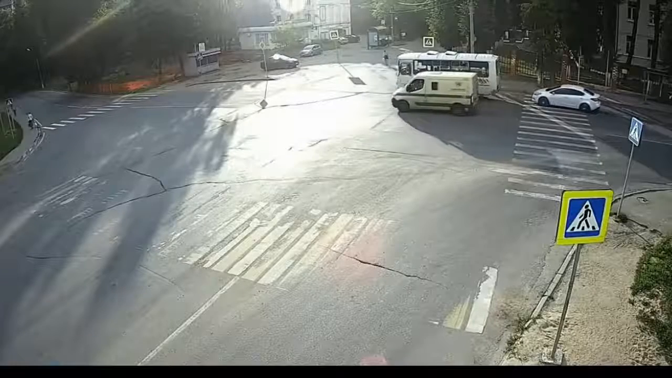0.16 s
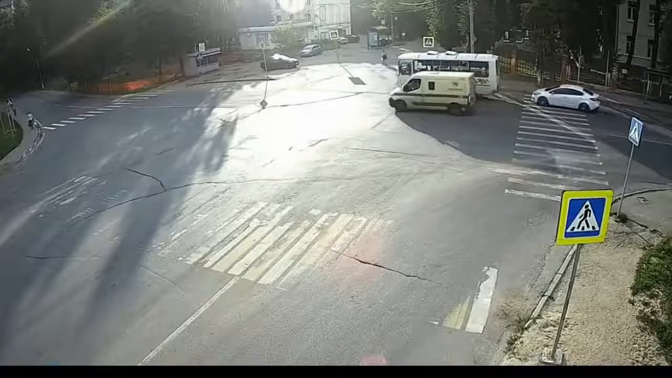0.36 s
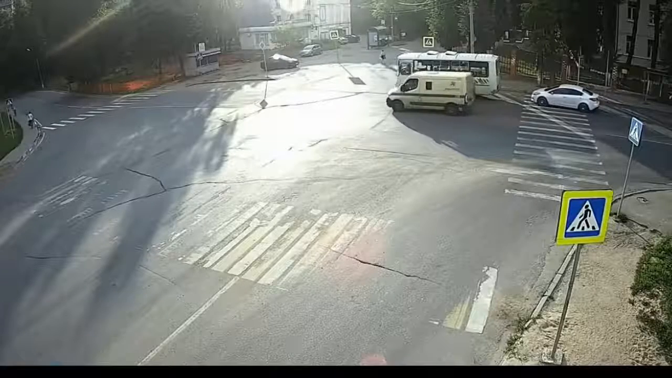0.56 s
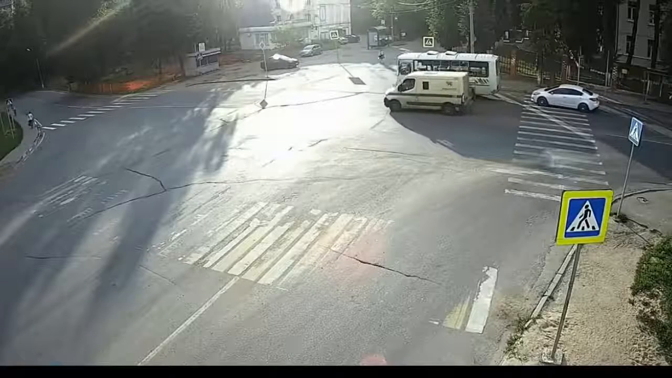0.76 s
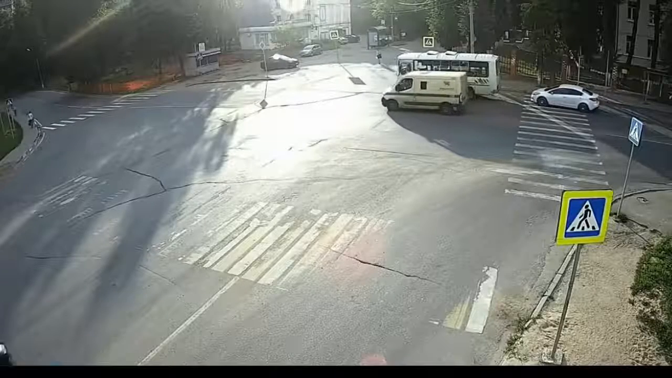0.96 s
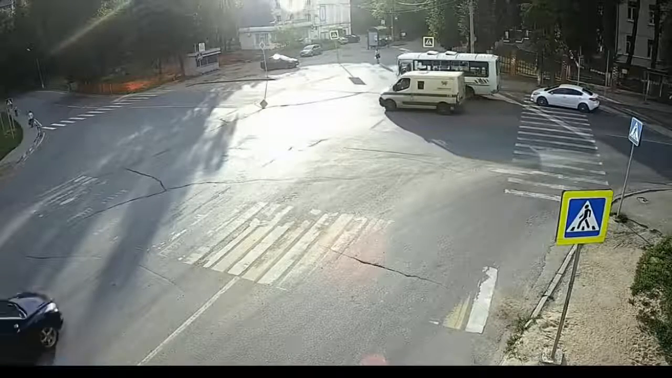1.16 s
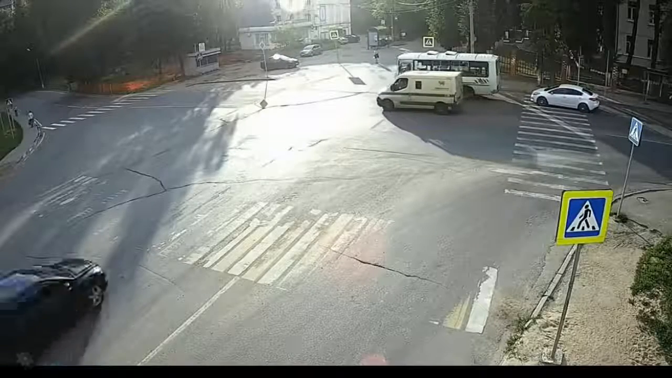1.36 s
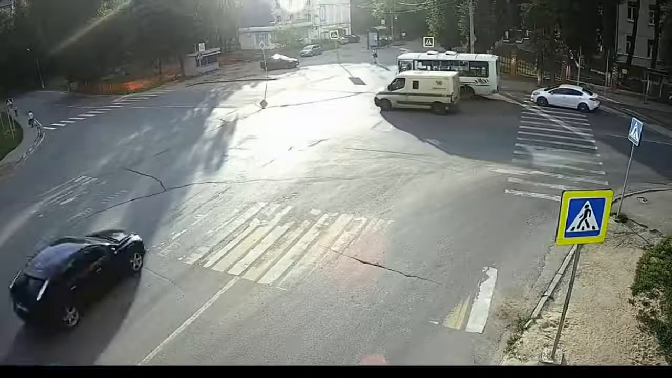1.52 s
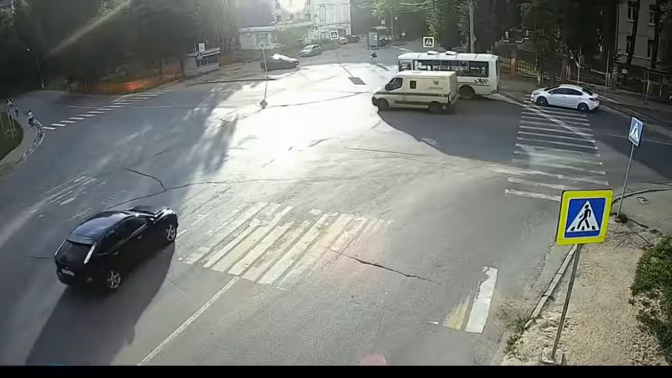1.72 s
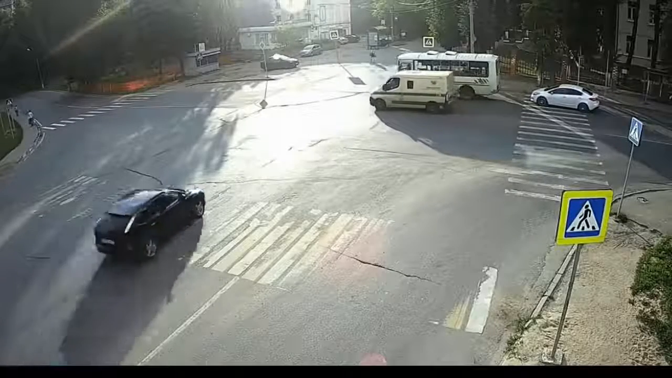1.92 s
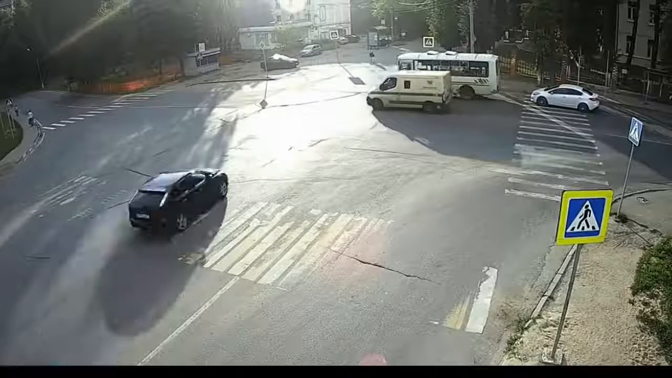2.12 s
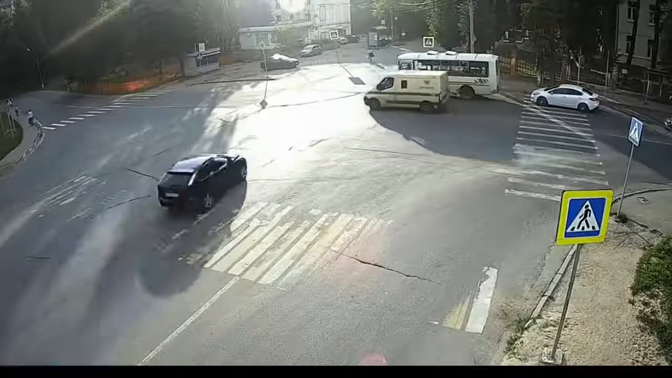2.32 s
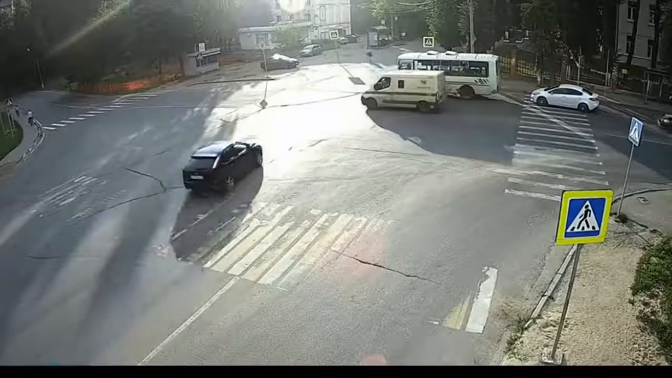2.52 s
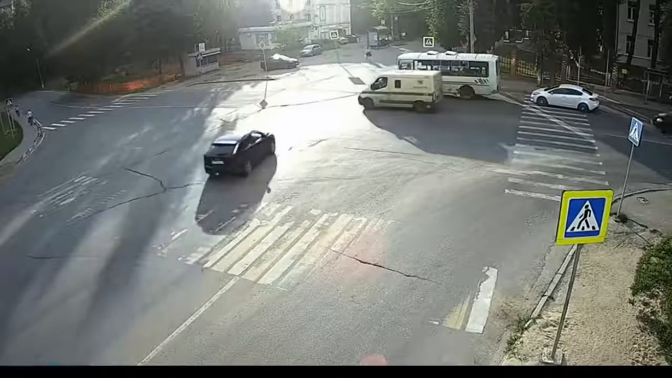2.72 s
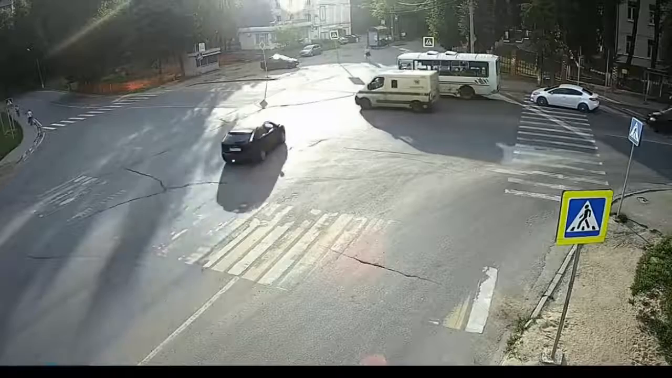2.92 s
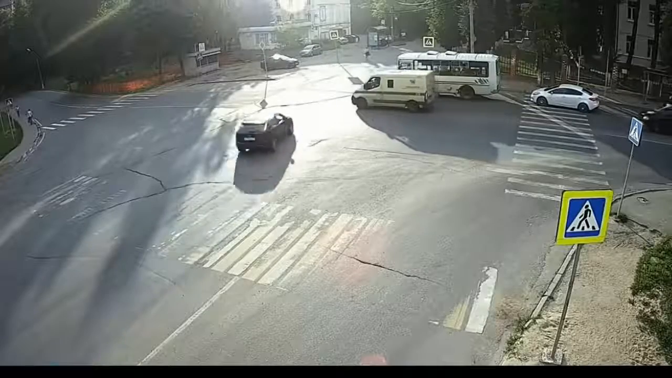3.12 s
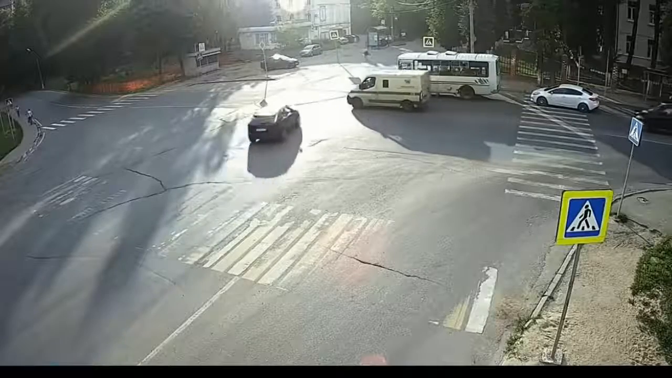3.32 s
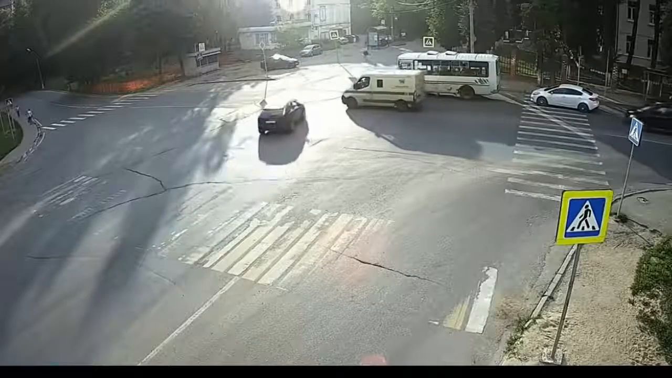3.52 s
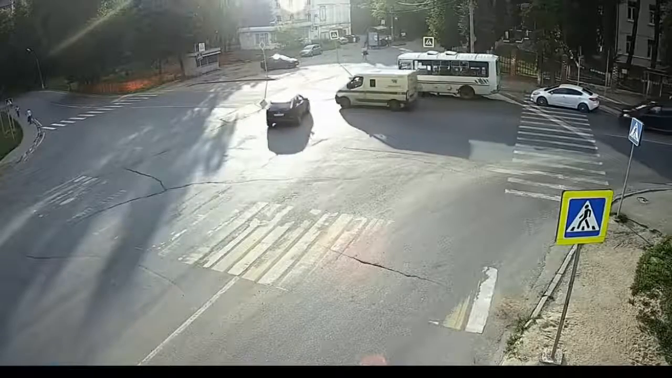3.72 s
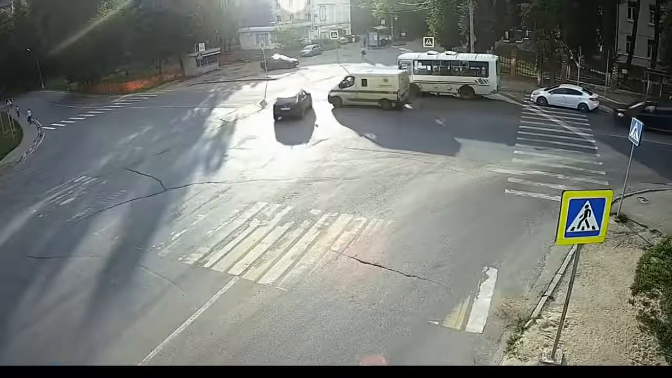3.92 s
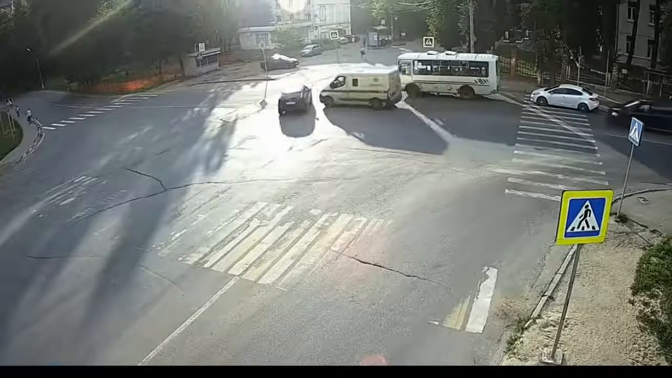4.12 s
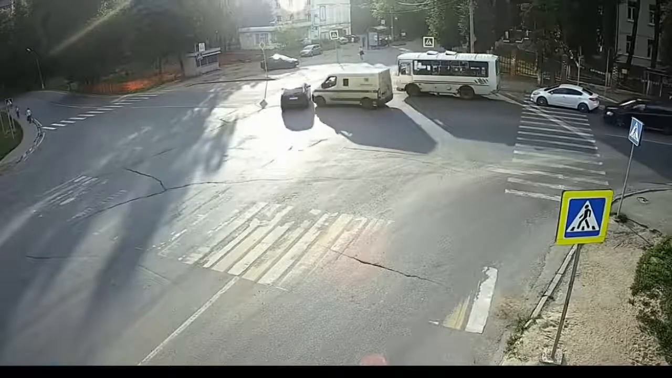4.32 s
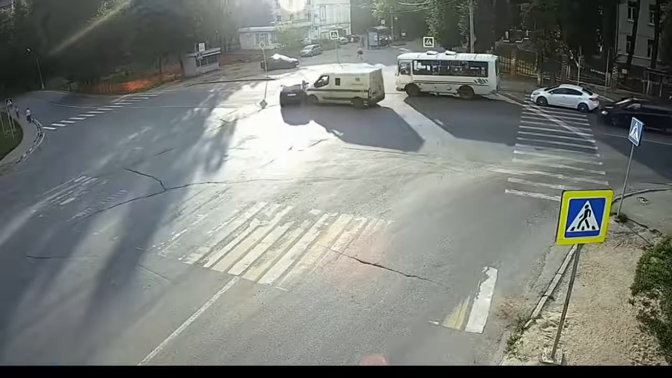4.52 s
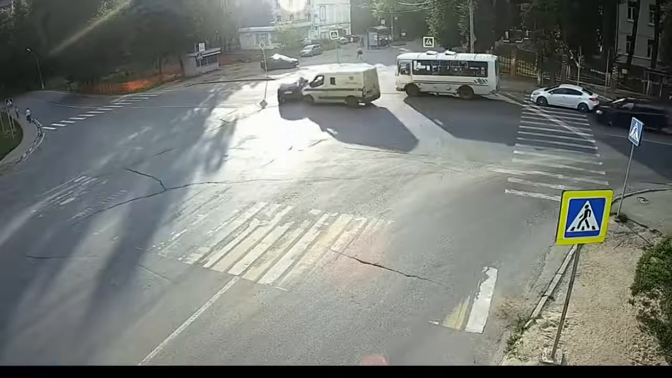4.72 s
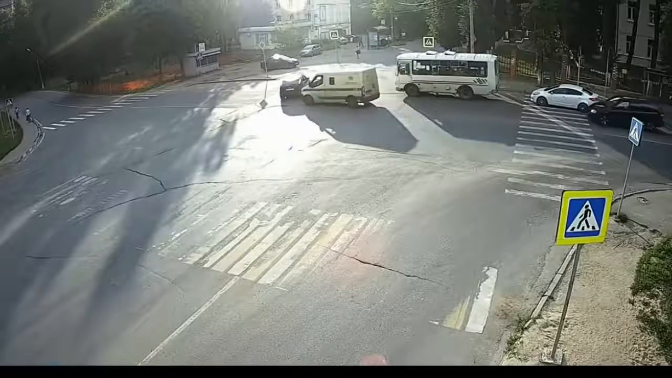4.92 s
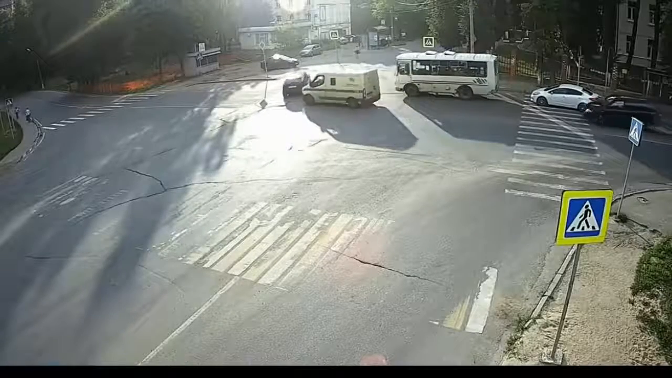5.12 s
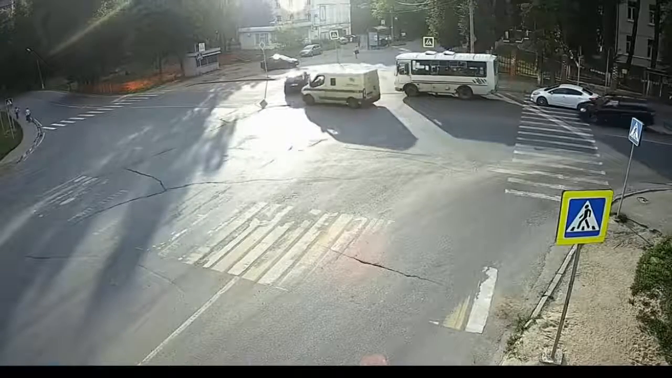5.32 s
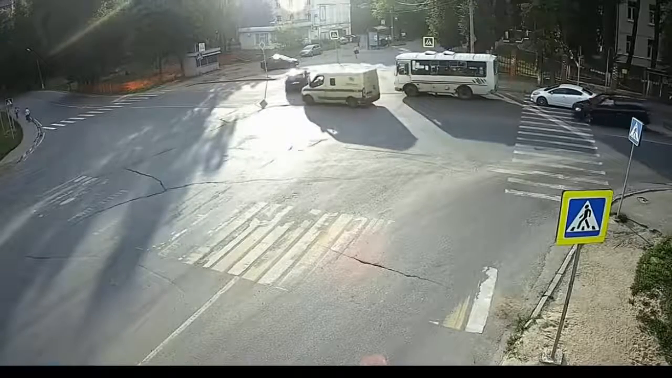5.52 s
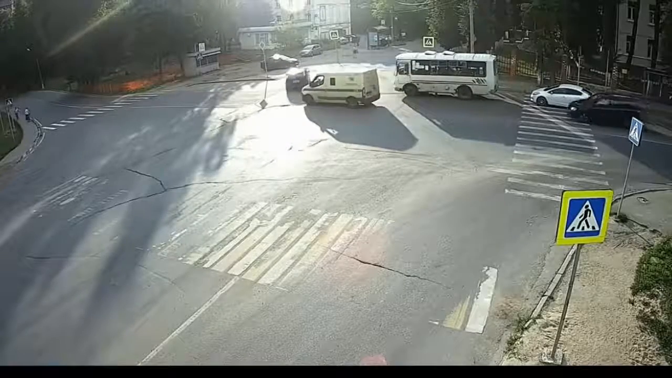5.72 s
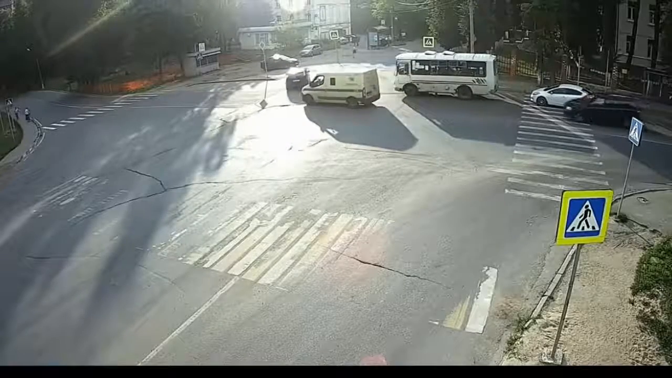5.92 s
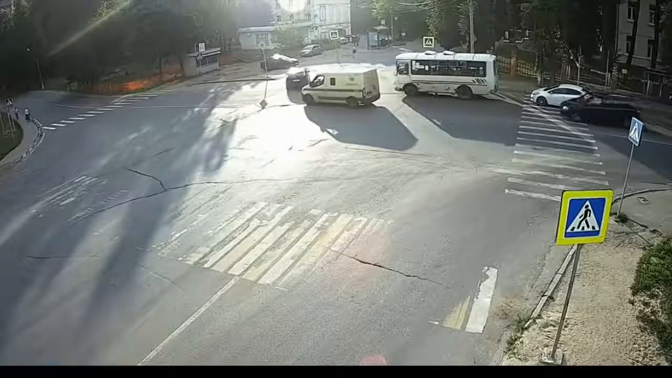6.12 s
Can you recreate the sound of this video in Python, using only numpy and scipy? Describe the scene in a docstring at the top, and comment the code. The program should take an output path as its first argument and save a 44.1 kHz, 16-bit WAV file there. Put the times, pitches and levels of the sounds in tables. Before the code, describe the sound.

From high above a city crossing, a low traffic rumble, engine drone and dull tyre roar run continuously. A car passes close below around 0.5 s with a soft hollow rush, then drives away with a rumbling wake and slowly rising engine hum until about 3 s. From 3.5 s a van pulls harder and a bus hums; one faint hollow knock comes at 3.7 s, then quick exhaust revs around 3.9-4.3 s with hiss and a tiny belt squeak. At 4.5 s a violent collision erupts: overlapping low panel thuds and cracking plastic packed into 0.15 s, then ragged tyre chirps near 4.65-4.75 s, gritty skidding and pattering fragments, with a diffuse street echo. Sound drops out at 5.03-5.09 s. A dry snap lands at 5.15 s. Faint hollow knocks at 5.5-6 s and a barely audible brake rub at 5.9 s end it as traffic quietens.

```python
"""Collision at a city crossing

Heard from up on a pole: coloured noise makes the traffic, a car passes below with a rush of tyres, a van
revs with a harmonic exhaust boom and a bus hums. Then two vehicles collide: struck resonators make the
panels buckle, showers of clicks crack the plastic, sine chirps and grit make tyres skid as the car is
shoved sideways, and fragments scatter. The sound cuts out for an instant, another piece snaps or lands,
a few hollow knocks follow, and the traffic quietens."""
import sys
import numpy as np
from scipy import signal
from scipy.fft import rfft, irfft, next_fast_len
from scipy.io import wavfile
from scipy.ndimage import uniform_filter1d

SR = 44100
rng = np.random.default_rng(int(sys.argv[2]) if len(sys.argv) > 2 else 0)


def to_wav(s):
    """Save 16-bit WAV."""
    ch = np.atleast_2d(s).T  # columns
    pcm = np.round(np.clip(ch, -1, 1) * 32767)  # PCM
    wavfile.write(sys.argv[1], SR, pcm.astype(np.int16))


N = 271215
TIME = np.arange(N) / SR

# -- Collision --
# Blows as the bodywork folds: start_s, thud_db, crack_db, crackle_decay_s
BLOWS = [(4.493, -31.5, -30, 0.011), (4.499, -16, -21.5, 0.01), (4.505, -16.5, -18.5, 0.016),
         (4.514, -11, -17, 0.014), (4.525, -32, -25, 0.037), (4.5504, -18.5, -17.5, 0.005),
         (4.556, -15.5, -26.5, 0.027), (4.569, -16, -27.5, .025), (4.590, -19.5, -35, 0.041),
         (4.642, -33, -27.5, 0.016)]
# Modes of doors, wings and body shells: pitch_hz, level_db (added to the thud), t60_s
PANEL_MODES = [(66.2, 1, 0.32), (85, -3.5, 0.37), (119.7, 0, 0.17), (152.7, -6, 0.14), (185.2, -3.5, 0.14),
               (215, -0.5, 0.11), (259, -3.5, 0.115), (289.7, -1.5, 0.17), (355, -5.5, 0.13),
               (402, -8.5, 0.13), (455, -6, 0.13), (487, -7.5, .18)]
# Resonances of trim and lamp housings: pitch_hz, width_hz, level_db (relative to the cracks)
TRIM_MODES = [(1000, 89, 2), (2040, 33, 3), (2180, 25, -6), (2710, 120, 1.5), (3470, 37, -5),
              (5060, 100, 1)]
# Brittle parts snap off or land: start_s, level_db
PIECES = [(4.5496, -19), (4.862, -32), (4.875, -37), (5.1486, -27.5)]
# Hollow knocks of loose parts: start_s, level_db
KNOCKS = [(3.724, -35.5), (5.526, -44.5), (5.594, -43.5), (5.626, -43), (5.736, -39.5), (5.997, -44.5)]
KNOCK_HZ = 1400
# Tyre slips: start_s, length_s, first_pitch_hz, last_pitch_hz, level_db, roughness (0-1)
TYRE_SLIPS = [(4.637, 0.03, 841, 785, -17.5, 0.56), (4.65, 0.02, 1030, 1190, -13.5, 0.36),
              (4.652, 0.039, 1197, 1220, -12, 0.16), (4.704, 0.039, 1240, 1233, -20.5, 0.2),
              (4.720, 0.021, 1112, 1056, -16, 0.08), (4.738, 0.021, 1190, 1235, -23, .4),
              (4.832, 0.053, 900, 1130, -35, 0.6), (4.928, 0.045, 806, 920, -37, 0.67),
              (5.172, 0.039, 785.3, 803, -43, 0)]
# Loose fragments skitter over the road
SCATTER_S, SCATTER_DB, SCATTER_FALL_DB_PER_S = 4.53, -44, 13
# The tyres scrub sideways, and the shoved car judders, loading and unloading them
SKID_S, SKID_DB, SKID_FALL_DB_PER_S = 4.63, -31, 48
ROCK_HZ, ROCK_DB, ROCK_PEAK_S = 10, 4, 4.75

# -- Vehicles --
# Engine speed of the van: time_s, firing_rate_hz
VAN_SPEED = [(3.6, 45), (3.92, 50.1), (4.0, 63.95), (4.08, 72.1), (4.25, 77), (4.34, 63.9), (4.7, 56.03),
             (5.05, 44), (6.15, 42)]
# Pushes on the van's throttle: start_s, rise_s, hold_s, release_s, exhaust_db
THROTTLE = [(3.448, 0.36, 1.2, 0.26, -34.5), (3.89, 0.036, 0.027, 0.033, -21),
            (4.006, 0.032, .025, .02, -23), (4.213, 0.071, 0.61, 0.11, -32.5),
            (5.08, .03, 0.095, .15, -34.5)]
# The van's engine hiss: level at idle, and its growth with engine speed
HISS_DB, HISS_DB_PER_OCTAVE, IDLE_HZ = -61.5, 7.5, 42
# The van's drive belt squeaks as the engine picks up; roughness runs 0-1
BELT_S, BELT_GAP_S, BELT_CHIRP_S = 3.915, .028, .025
BELT_HZ, BELT_DB, BELT_ROUGH = 4630, -57.5, .35
# The car below the pole: moment and distance of closest approach, speed, tyre level at that point
PASS_S, PASS_M, PASS_M_PER_S, PASS_DB = .55, 6.3, 10.8, -40
# Its wake as it drives off, and its climbing engine note
AWAY_S, AWAY_RISE_S, AWAY_HOLD_S, AWAY_FADE_S = .75, 0.62, 0.47, .8
CAR_HZ, CAR_GAIN_HZ_PER_S, CAR_HUM_DB = 171.2, 14, -42.5
BUS_HZ, BUS_DB = 174.6, -40.5
BRAKE_S, BRAKE_DB = 5.87, -69.5
HUSH_S = 4.89   # the drivers lift off and brake after the collision

# -- Noise colours, each: frequency_hz, level_db (per Hz; only the shape matters) --
# Cracking plastic and creasing metal
CRUNCH_COLOUR = [(150, 4), (400, -2.5), (500, -6.5), (570, 1.5), (780, 0), (960, -3.5), (1400, 0),
                 (1800, -10.5), (2700, -12.5), (3600, -18), (5500, -25), (7500, -31.5), (15000, -51)]
# Small fragments
SPLINTER_COLOUR = [(1000, -8), (2300, 6), (3500, -1), (5500, -7.5), (8000, -18), (15000, -24)]
# Larger pieces
SNAP_COLOUR = [(200, 3), (700, 11.5), (1500, -0.5), (3000, -12), (5500, -16), (9000, -27), (15000, -32)]
# Grit under sliding tread
SCRUB_COLOUR = [(450, -12), (800, -3.5), (1050, 4), (1350, -0.5), (1800, -10.5), (2500, -18.5), (4000, -28)]
# Hollow rush of tyres close by
NEAR_TYRE_COLOUR = [(300, -17.5), (500, -3.5), (820, 2), (1050, -4.5), (1400, -30.5), (3000, -39)]
# Hiss of the pulling van
VAN_HISS_COLOUR = [(1200, -13), (2100, 1), (2500, 8.5), (3100, -4), (3900, -6), (4700, -9.5), (6000, -10.5),
                   (7500, -21.5), (14000, -26)]
# Slipping belt and brake
RUB_COLOUR = [(3000, -6), (4700, 3), (6000, -3), (8000, -12), (15000, -15)]
# Low engine rumble
RUMBLE_COLOUR = [(12, -19.5), (25, 2), (40, -0.5), (55, -1), (75, -7), (100, -12.5), (160, -32.5)]
# Engine drone
DRONE_COLOUR = [(60, -23.5), (100, -3.5), (135, 1), (190, -2), (235, -2.5), (290, -3.5), (380, -9),
                (480, -9), (560, -15.5), (800, -28), (1500, -45)]
# Tyre roar
ROAR_COLOUR = [(300, -18.5), (600, -2), (830, -2.5), (1060, 1.5), (1450, -3), (2000, -11), (2600, -16),
               (3500, -22.5), (5500, -31), (7500, -38), (15000, -43)]
# Fizz on top of everything
FIZZ_COLOUR = [(300, -12), (7000, 2.5), (11000, 1), (15500, -5)]

# The sound cuts out: from_s, to_s
SILENCE = (5.026, 5.086)
CUTOFF_HZ = 15700


def thuds(uneven_db=1.0):
    """Every blow pushes each panel in or out with a strength of its own, and the panel rings."""
    start_s, thud_db = np.transpose(BLOWS)[:2]
    at = (start_s * SR).astype(int)
    out = np.zeros(N)
    for hz, mode_db, t60 in PANEL_MODES:
        push_db = thud_db + mode_db + uneven_db * rng.standard_normal(len(at))
        pushes = np.zeros(N)
        pushes[at] = from_db(push_db) * rng.choice([-1, 1], len(at))
        out += ring(pushes, hz, t60)
    return out


def crunch():
    """Each blow sets off a run of tiny fractures and creases that ring in the trim."""
    power = sum((from_db(crack_db) * burst(s, decay)) ** 2 for s, thud_db, crack_db, decay in BLOWS)
    strain = np.sqrt(power)
    cracks = colour(strain * grains(per_s=6000, spread_db=0.0), CRUNCH_COLOUR)
    return cracks + sum(from_db(db) * resonance(cracks, hz, width) for hz, width, db in TRIM_MODES)


def debris(snap_decay_s=0.0016):
    """Splinters patter down in a fading shower of clicks; larger pieces give a dry snap of noise."""
    fall_db = SCATTER_FALL_DB_PER_S * np.maximum(TIME - SCATTER_S, 0)
    shower = swell(SCATTER_S, rise=0.017, hold=0.31, release=.035) * from_db(SCATTER_DB - fall_db)
    splinters = colour(shower * grains(per_s=9000, spread_db=1.5), SPLINTER_COLOUR)
    snap_level = sum(from_db(db) * burst(s, snap_decay_s) for s, db in PIECES)
    return splinters + colour(snap_level * rng.standard_normal(N), SNAP_COLOUR)


def knocks(width_hz=330, decay_s=0.0084):
    """Each knock is a brief rattle of noise ringing in one broad, hollow resonance."""
    rattle = sum(from_db(db) * burst(s, decay_s) for s, db in KNOCKS) * rng.standard_normal(N)
    body = resonance(resonance(rattle, KNOCK_HZ, width_hz), KNOCK_HZ, 2 * width_hz)
    return body * np.sqrt(SR / (2 * width_hz))   # make up for the power lost outside the narrow band


def skid():
    """Grit grinds under the sliding tread in fading surges; now and then the tread breaks into a chirp."""
    rocking = np.cos(2 * np.pi * ROCK_HZ * (TIME - ROCK_PEAK_S))
    fall_db = SKID_FALL_DB_PER_S * np.maximum(TIME - SKID_S, 0)
    scrub_db = SKID_DB - fall_db + ROCK_DB * rocking
    sliding = swell(SKID_S, rise=0.0088, hold=.6, release=0.074) * from_db(scrub_db)
    scrub = colour(sliding * grains(per_s=3000, spread_db=2.0), SCRUB_COLOUR)
    return scrub + squeals(TYRE_SLIPS, octave_db=-17.5)


def squeals(slips, octave_db, jitter=0.11, rasp_db=5, rise=0.58, fall=1.67):
    """Rubber sticks and slips: short gliding chirps, ragged in pitch and level where the grip is uneven."""
    out = np.zeros(N)
    wobble, judder = drift(700), drift(600)
    for s, length, first_hz, last_hz, db, rough in slips:
        at = slice(int(s * SR), int((s + length) * SR))
        progress = np.linspace(0, 1, at.stop - at.start)
        glide_hz = first_hz + (last_hz - first_hz) * progress
        phase = turn(glide_hz * (1 + jitter * rough * wobble[at]))
        tone = np.sin(phase) + from_db(octave_db) * np.sin(2 * phase)
        load = progress ** rise * (1 - progress) ** fall
        out[at] += from_db(db + rasp_db * rough * judder[at]) * load / load.max() * tone
    return out


def van(second_db=-26, third_db=-26, waver=0.0495, throb=0.15):
    """Throttle swells the exhaust boom at the firing rate; hiss grows with speed and pulses per firing."""
    firing_hz = np.interp(TIME, *np.transpose(VAN_SPEED))
    phase = turn(firing_hz * (1 + waver * drift(30)))
    exhaust = np.sin(phase) + from_db(second_db) * np.sin(2 * phase) + from_db(third_db) * np.sin(3 * phase)
    boom = sum(from_db(db) * swell(s, rise, hold, release) for s, rise, hold, release, db in THROTTLE)
    hiss_db = HISS_DB + HISS_DB_PER_OCTAVE * np.log2(firing_hz / IDLE_HZ)
    pulling = swell(3.13, rise=0.69, hold=0.93, release=1.2) * from_db(hiss_db)
    hiss = pulling * noise(VAN_HISS_COLOUR, flutter_db=3.5) * (1 + throb * np.cos(phase))
    return boom * np.sqrt(2) * exhaust + hiss + belt()


def belt(count=5, wander=0.011, rub_db=-60.0):
    """The drive belt slips: a rubbing hiss with a short, uneven run of chirps."""
    chirps = []
    for k, (early_or_late, first, last) in enumerate(rng.standard_normal((count, 3))):
        start_s = BELT_S + BELT_GAP_S * (k + early_or_late / 4)
        first_hz, last_hz = BELT_HZ * (1 + wander * first), BELT_HZ * (1 + wander * last)
        chirps.append((start_s, BELT_CHIRP_S, first_hz, last_hz, BELT_DB, BELT_ROUGH))
    rubbing = from_db(rub_db) * swell(BELT_S, rise=0.017, hold=0.094, release=0.072)
    return rubbing * noise(RUB_COLOUR, flutter_db=-1.0) + squeals(chirps, octave_db=-32)


def passing_car(falloff=2.57, rumble_db=-29, drone_db=-41, roar_db=-50, waver=0.0401):
    """Tyre rush peaks at the closest point; rumble, roar and a climbing engine note then trail away."""
    distance_m = np.hypot(PASS_M, PASS_M_PER_S * (TIME - PASS_S))
    nearness = (PASS_M / distance_m) ** falloff
    tyres = from_db(PASS_DB) * nearness * noise(NEAR_TYRE_COLOUR, flutter_db=1.6)
    layers = [(rumble_db, RUMBLE_COLOUR), (drone_db, DRONE_COLOUR), (roar_db, ROAR_COLOUR)]
    wake = sum(from_db(db) * noise(spectrum, flutter_db=0.9) for db, spectrum in layers)
    wake *= swell(AWAY_S, AWAY_RISE_S, AWAY_HOLD_S, AWAY_FADE_S)
    hz = (CAR_HZ + CAR_GAIN_HZ_PER_S * (TIME - AWAY_S)) * (1 + waver * drift(50))
    hum = from_db(CAR_HUM_DB) * np.sqrt(2) * np.sin(turn(hz))
    return tyres + wake + swell(AWAY_S, rise=0.76, hold=1.4, release=0.25) * hum


def bus(waver=0.029):
    """One unsteady engine order hums louder as the bus moves off, then fades."""
    load = swell(3.514, rise=.5, hold=.9, release=0.14)
    return from_db(BUS_DB) * load * np.sqrt(2) * np.sin(turn(BUS_HZ * (1 + waver * drift(60))))


def brake():
    """A faint, brief rub of pads on a disc as a vehicle comes to rest."""
    rubbing = from_db(BRAKE_DB) * swell(BRAKE_S, rise=.1, hold=0.045, release=0.13)
    return rubbing * noise(RUB_COLOUR, flutter_db=1.5)


def traffic():
    """Many engines and tyres merge into rumble, drone and roar."""
    rumble = flow(level_db=-29.5, recede_db_per_s=.3, hush_db=12.5, hush_time=1.44, surge_db=1.0)
    drone = flow(level_db=-34.5, recede_db_per_s=0.63, hush_db=11.5, hush_time=.6, surge_db=0.32)
    roar = flow(level_db=-44.5, recede_db_per_s=0.21, hush_db=6, hush_time=0.4, surge_db=.3)
    return (rumble * noise(RUMBLE_COLOUR, flutter_db=0.44)
            + drone * noise(DRONE_COLOUR, flutter_db=0.8)
            + roar * noise(ROAR_COLOUR, flutter_db=0.15))


def flow(level_db, recede_db_per_s, hush_db, hush_time, surge_db):
    """Gain of one traffic layer: surges by chance, slowly recedes, settles lower after the collision."""
    settled = 1 - np.exp(-np.maximum(TIME - HUSH_S, 0) / hush_time)
    return from_db(level_db - recede_db_per_s * TIME - hush_db * settled + surge_db * drift(3.934))


def street(x, wet_db, t60=1.19, wall_cut_hz=3500, gap=0.037):
    """House fronts and trees return a dull, diffuse tail that swells in over a short gap (s)."""
    t = TIME[:2 * SR]
    fade = np.exp(-np.log(1000) * t / t60)
    tail = rng.standard_normal(len(t)) * fade * (1 - np.exp(-(t / gap) ** 2))
    dulling = signal.butter(1, wall_cut_hz, fs=SR, output="sos")
    tail = signal.sosfilt(dulling, tail / np.linalg.norm(tail))
    return x + from_db(wet_db) * signal.fftconvolve(x, tail)[:N]


def noise(spectrum, flutter_db):
    """Coloured noise of unit power whose level wavers."""
    return rms_one(colour(rng.standard_normal(N), spectrum) * from_db(flutter_db * drift(14)))


def grains(per_s, spread_db):
    """Random clicks of either sign and unit power; a wider spread makes a few stand out."""
    sizes = from_db(spread_db * np.minimum(rng.exponential(1, N), 4)) * rng.choice([-1, 1], N)
    return rms_one(sizes * (rng.random(N) < per_s / SR))


def colour(x, spectrum):
    """Causal (minimum-phase) filter of the given spectrum, with unit mean power gain."""
    size = next_fast_len(N + SR // 2, True)
    hz, db = np.transpose(spectrum)
    # steep skirts at both ends
    hz = np.r_[hz[0] / 2, hz, hz[-1] * 2]
    db = np.r_[db[0] - 20, db, db[-1] - 40]
    bins_hz = np.fft.rfftfreq(size, 1 / SR)
    gain = rms_one(from_db(np.interp(np.log(bins_hz + 1), np.log(hz), db)))
    # folding the cepstrum onto positive time gives minimum phase
    cepstrum = irfft(np.log(gain), size)
    cepstrum[1:size // 2] *= 2
    cepstrum[size // 2 + 1:] = 0
    return irfft(rfft(x, size) * np.exp(rfft(cepstrum)), size)[:N]


def ring(x, hz, t60):
    """A unit click sets a decaying sine of height 1 ringing."""
    r, w = from_db(-60 / (t60 * SR)), 2 * np.pi * hz / SR
    return signal.lfilter([0, np.sin(w)], [1, -2 * r * np.cos(w), r * r], x + 1e-18)


def resonance(x, hz, width):
    """A two-pole band-pass with a peak gain of about 1."""
    r, w = np.exp(-np.pi * width / SR), 2 * np.pi * hz / SR
    zeros = np.array([1, 0, -1]) * (1 - r * r) / 2
    return signal.lfilter(zeros, [1, -2 * r * np.cos(w), r * r], x + 1e-18)


def burst(s, decay):
    """An envelope that jumps to 1 and dies away."""
    return (TIME >= s) * np.exp(-np.minimum(np.abs(TIME - s) / decay, 20))


def swell(s, rise, hold, release):
    """An envelope that climbs to 1, holds and dies away; all times in seconds."""
    climb = np.clip((TIME - s) / rise, 0, 1)
    return climb * np.exp(-np.clip((TIME - s - rise - hold) / release, 0, 20))


def drift(rate):
    """Random wander of unit power: straight lines between rate random points a second."""
    knots = rng.standard_normal(N // 10)
    return rms_one(np.interp(TIME * rate, np.arange(len(knots)), knots))


def turn(hz):
    """Running phase in radians of a tone with changing pitch."""
    return 2 * np.pi * np.cumsum(hz) / SR


def rms_one(x):
    """Scale to unit power."""
    return x / np.sqrt(np.mean(x ** 2) + 1e-20)


def from_db(db):
    """Decibels to gain."""
    return 10 ** (np.asarray(db) / 20)


def scene():
    """The collision echoes round the crossing; the tyres, low under the bodywork, echo less."""
    collision = street(thuds() + crunch() + debris() + knocks(), wet_db=-12.5)
    sliding = street(skid(), wet_db=-23.0)
    vehicles = van() + passing_car() + bus() + brake()
    return (collision + sliding + vehicles + traffic())[None]


def record(dry, top=0.64, fizz_db=-44):
    """Peaks are rounded, a faint fizz follows the waveform's size, the sound drops out once, the top is cut."""
    rounded = top * np.tanh(dry / top)
    fizz = from_db(fizz_db) * np.abs(rounded) * colour(rng.standard_normal(N), FIZZ_COLOUR)
    audible = (TIME < SILENCE[0]) | (TIME > SILENCE[1])
    live = uniform_filter1d(1. * audible, size=90)   # soft edges of 90 samples
    top_cut = signal.ellip(12, .1, 90, CUTOFF_HZ, fs=SR, output="sos")
    return signal.sosfilt(top_cut, (rounded + fizz) * live)


dry = scene()
out = record(dry)
to_wav(out)
```